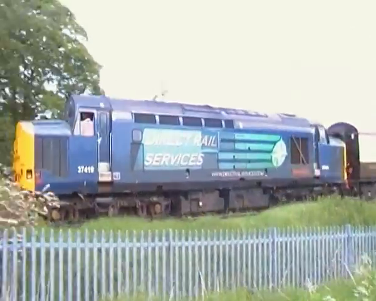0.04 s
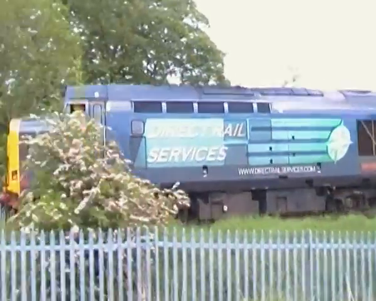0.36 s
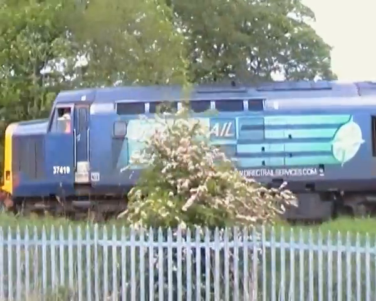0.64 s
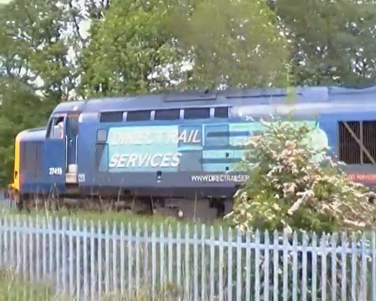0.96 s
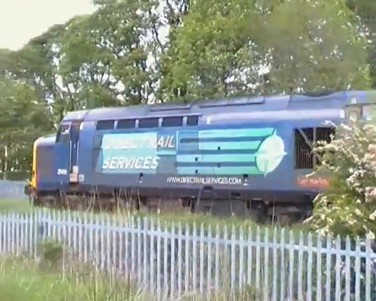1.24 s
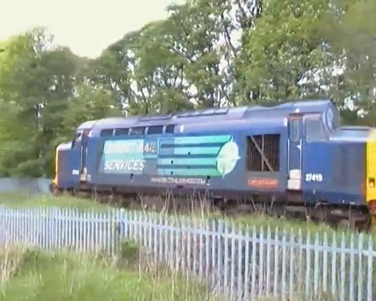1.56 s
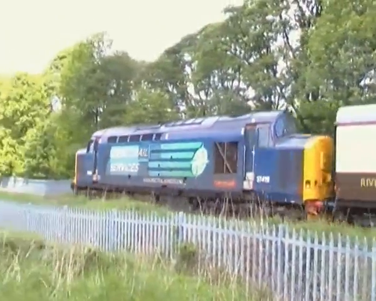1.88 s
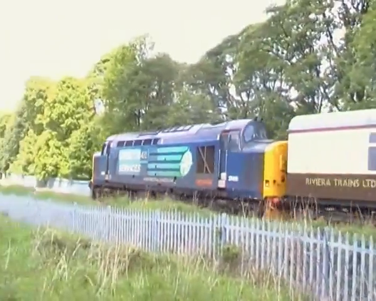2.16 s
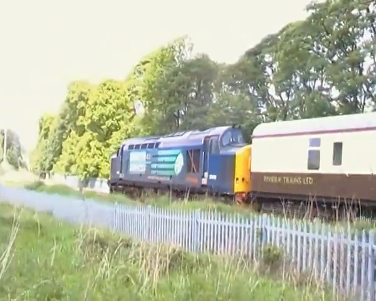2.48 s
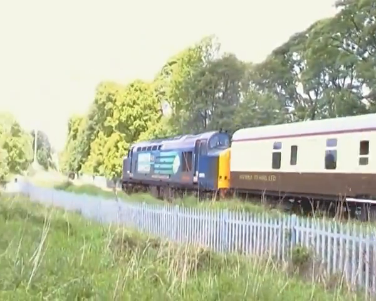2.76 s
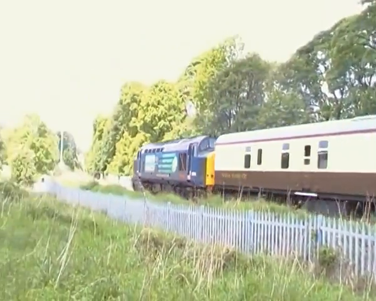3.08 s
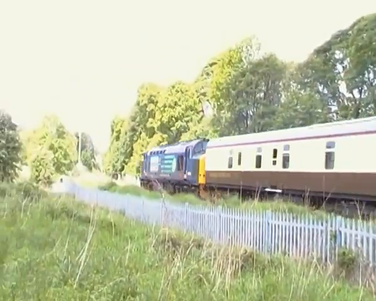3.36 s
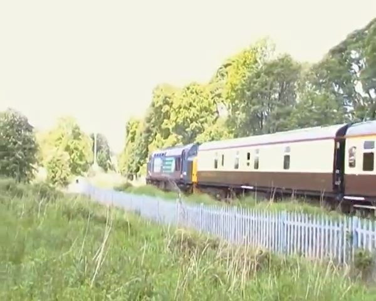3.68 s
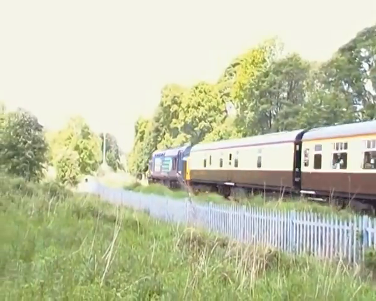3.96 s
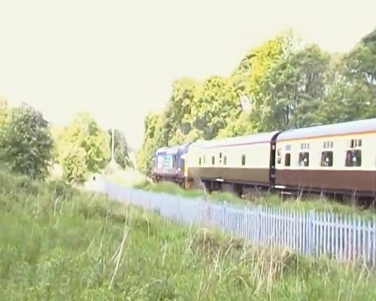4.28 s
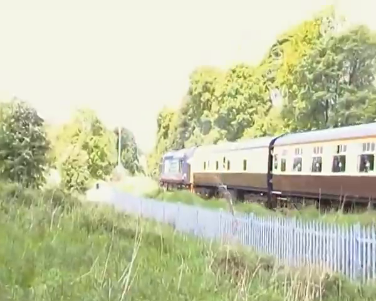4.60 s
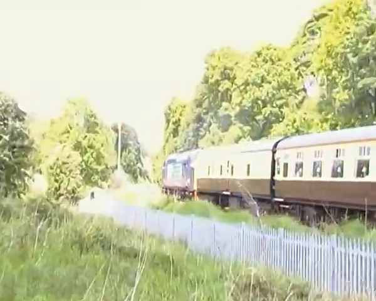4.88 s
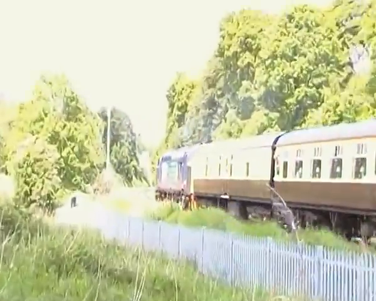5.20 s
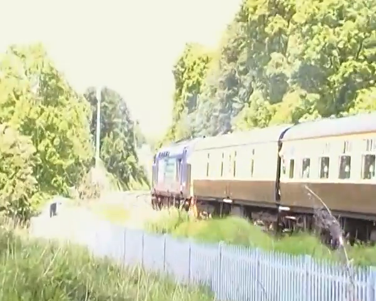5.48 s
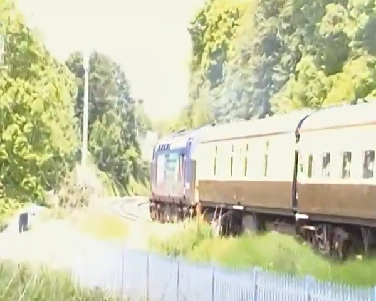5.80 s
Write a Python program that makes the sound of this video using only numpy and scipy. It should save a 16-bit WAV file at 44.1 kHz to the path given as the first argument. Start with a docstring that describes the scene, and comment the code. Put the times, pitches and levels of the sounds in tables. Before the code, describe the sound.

A diesel locomotive passes close at full power, throbbing and rasping with a turbo whistle, then pulls away as its coaches clank and roll by.

```python
"""A twelve-cylinder diesel locomotive comes up at full power, its uneven exhaust puffs making a throbbing
drone and a rasping bark while the turbocharger whistles and spits in time with them. It passes at one
second and the pitch sags. As it turns away, couplings clank, hard firings crack, and the tone hollows,
the exhaust now heard from behind over the grass. Last, the wheels swell as the coaches roll by and
screen the stack."""
import sys
import numpy as np
from scipy import signal
from scipy.fft import rfft, irfft, next_fast_len
from scipy.io import wavfile

SR = 44100
rng = np.random.default_rng(int(sys.argv[2]) if len(sys.argv) > 2 else 0)


def transcribe(signal):
    """Save signal, clipped to [-1, 1], as a 16-bit WAV file at the path in sys.argv[1]."""
    frames = np.atleast_2d(signal).T
    limited = np.clip(frames, -1, 1)
    pcm = np.round(limited * 32767).astype(np.int16)
    wavfile.write(sys.argv[1], SR, pcm)


N = 266364
TIME = np.arange(N) / SR
PASS_S, TRACK_M, SPEED_M_PER_S = 1, 12.2, 14.8
# doublings of the locomotive's distance since its closest point
DOUBLINGS = np.log2(np.hypot(TRACK_M, SPEED_M_PER_S * (TIME - PASS_S)) / TRACK_M)


def amp(db):
    """Decibels to gain."""
    return np.exp(np.asarray(db) * (np.log(10) / 20))


def unit_rms(x):
    """Scales to rms 1."""
    return x / np.sqrt(np.mean(x ** 2) + 1e-20)


def curve(rows):
    """An automation curve, at every sample."""
    return np.interp(TIME, *np.transpose(rows))


def eq_db(points, hz):
    """Reads an EQ curve on a log-frequency axis."""
    f, db = np.transpose(points)
    return np.interp(np.log(hz + 1), np.log(f + 1), db)


def eq(x, points, delay_s=0):
    """Applies an EQ curve (f/Hz, level/dB) and an optional delay."""
    size = next_fast_len(N + 4096, real=True)
    hz = np.fft.rfftfreq(size, 1 / SR)
    lag = np.exp(-2j * np.pi * hz * delay_s)
    return irfft(rfft(x, size) * amp(eq_db(points, hz)) * lag, size)[:N]


def noise():
    """White noise."""
    return rng.standard_normal(N)


def wander(per_s):
    """Random modulation of rms 1."""
    return unit_rms(np.interp(TIME * per_s, np.arange(4096), rng.standard_normal(4096)))


def swell(s, half_s):
    """A smooth bump of height 1 around one moment."""
    return np.exp(-np.minimum(((TIME - s) / half_s) ** 2, 20))


def resonate(x, hz, width_hz):
    """A resonance at a fixed or moving pitch, applied twice for steep skirts."""
    carrier = np.exp(2j * np.pi * (np.cumsum(np.full(N, hz) / SR) % 1))
    r = np.exp(-np.pi * width_hz / SR)
    baseband = signal.lfilter([(1 - r) ** 2], [1, -2 * r, r * r], x * carrier.conj())
    return unit_rms((carrier * baseband).real)


# engine cycle rate, sagging with the Doppler shift: t/s, f/Hz
CYCLE_RATE = [(0.0, 7.291), (0.5, 7.237), (1.0, 7.095), (1.5, 6.976), (2.0, 6.876), (3.0, 6.824),
              (4.0, 6.793), (6.04, 6.79)]
def engine_cycles():
    """The engine's clock: cycles heard so far."""
    return np.cumsum(curve(CYCLE_RATE)) / SR


def firings(cycles, twelfths, db, scatter_db, jitter_s):
    """One click for each firing; no two burn quite alike."""
    beats = np.arange(46)[:, None] + twelfths / 12
    timing, strength = rng.standard_normal((2, *beats.shape))
    at_s = np.interp(beats, cycles, TIME, right=-1) + jitter_s * timing
    heard = (at_s > 0) & (at_s < TIME[-1])
    return np.bincount((at_s[heard] * SR).astype(int), amp(db + scatter_db * strength)[heard], N)


def puffs(clicks, rise_s, fall_s, steady):
    """Gas flow: each firing swells softly and dies over a steady stream."""
    t = TIME[:SR // 10]
    shape = (1 - np.exp(-(t / rise_s) ** 2)) * np.exp(-t / fall_s)
    return unit_rms(unit_rms(signal.oaconvolve(clicks, shape)[:N]) + steady)


# how far the locomotive has turned its back: t/s, aspect (0 beside, 1 three-quarter, 2 behind)
ASPECT = [(1.35, 0.19), (1.7, 0.77), (3.1, 1.14), (4.5, 1.6)]
def fader(aspects_db, doubling_db=0, bush_db=0, screen_db=0):
    """A layer's gain from the three aspects, the distance, a bush in the way and the screening coaches."""
    facing_db = np.interp(curve(ASPECT), [0, 1, 2], aspects_db)
    in_bush = swell(0.87, 0.37)
    screened = (1 + np.tanh((TIME - 5.18) / 0.099)) / 2
    return amp(facing_db + doubling_db * DOUBLINGS + bush_db * in_bush + screen_db * screened)


def turning_dip(depth_db=-5):
    """The level ducks briefly as the locomotive turns away."""
    return amp(depth_db * swell(1.69, 0.19))


# EQ of the rolling bed: f/Hz, level/dB
WHEELS_EQ = [(15, -19), (60, -15), (130, -5), (230, -16), (430, 0.5), (800, -4), (1400, -6.5),
             (2500, -12.5), (4500, -24.5), (7000, -29), (12000, -64)]
def wheels(uneven_db=1.5):
    """Roar of wheels on rails, growing as the coaches come by."""
    rolling_db = curve([(2.2, -22), (4.5, -17.5)])
    return unit_rms(eq(noise(), WHEELS_EQ)) * amp(rolling_db + uneven_db * wander(14))


# hits of couplings and bogies: t/s, level/dB before the trim, f/Hz
CLANKS = [(1.8294, -15, 1420), (2.2365, -10.5, 1220), (2.5213, -13, 1660), (2.5726, -10, 1260),
          (3.207, -10.5, 1560), (4.2866, -19, 1656), (4.678, -10, 1514)]
def clanks(attack_s=0.001, ring_s=0.017, trim_db=-4):
    """Steel knocks: a close cluster of modes that dies quickly."""
    t, out = TIME[:SR // 8], np.zeros(N + SR)
    envelope = np.exp(-t / ring_s) * (1 - np.exp(-t / attack_s))
    for s, db, hz in CLANKS:
        modes = sum(np.sin(2 * np.pi * (hz * ratio * t + rng.random())) for ratio in (0.94, 1, 1.05))
        out[int(s * SR):][:len(t)] += amp(db + trim_db) * modes * envelope
    return out[:N]


# rasp cues: t/s, half length/s, level/dB, centre f/Hz
RASPS = [(1.056, 0.035, -26, 3000), (1.2, 0.022, -26, 3000), (3.438, 0.04, -18.5, 1560),
         (3.76, 0.071, -23.5, 1600), (4.33, 0.11, -28, 1630), (4.683, 0.09, -21.5, 1570),
         (4.95, 0.078, -22, 1560)]
# EQ of one rasp: multiple of the centre, level/dB
RASP_EQ = [(0.56, -21), (1, 14.5), (1.6, 7), (2.6, 8), (3.75, 0), (5.6, -21)]
def rasps(grain_db=1.8):
    """Short, grainy swells of rubbing steel and rushing gas."""
    out = 0
    for s, half_s, db, hz in RASPS:
        band = eq(noise(), [(hz * ratio, band_db) for ratio, band_db in RASP_EQ])
        out += amp(db) * swell(s, half_s) * unit_rms(band)
    return out * unit_rms(amp(grain_db * wander(150)))


# partials of the engine's hum: multiple of the cycle rate, rms level/dB
ENGINE_HARMONICS = [(48, -47), (53, -39.5), (60, -65), (64, -35), (68, -36)]
def engine_hum(cycles):
    """Faint, steady humming tones locked to the engine cycle."""
    return sum(amp(db + 0.5 * wander(2.8)) * np.sqrt(2) * np.sin(2 * np.pi * order * cycles)
               for order, db in ENGINE_HARMONICS)


# the whistle swells and fades in the hot air: t/s, half length/s, level change/dB
WHISTLE_SWELLS = [(0.1, 0.047, 3), (0.304, 0.029, -9), (0.49, 0.04, -3), (0.6, 0.027, 3.5),
                  (0.657, 0.022, -16), (0.78, 0.023, -8), (1.069, 0.035, 5), (1.206, 0.032, 1),
                  (1.42, 0.046, 2), (1.97, 0.07, -2)]
def turbo_whistle(cycles, flow, order=536.5, waver_hz=17, flutter_db=4.2, octave_db=-20, chop=0.14):
    """The turbocharger's blade tone and its octave; puffs chop it and hot air makes it flutter."""
    blades = order * cycles + np.cumsum(waver_hz * wander(110)) / SR
    tone = np.sin(2 * np.pi * blades) + amp(octave_db) * np.sin(4 * np.pi * blades)
    flutter = amp(flutter_db * np.minimum(wander(80), 1))
    envelope = unit_rms(flutter * (1 - chop + chop * flow))
    swells_db = sum(db * swell(s, half_s) for s, half_s, db in WHISTLE_SWELLS)
    return np.sqrt(2) * tone * envelope * amp(swells_db) * fader((-25.5, -34, -37), doubling_db=-1.5)


# EQ of the spit's sizzle: f/Hz, level/dB
SPIT_EQ = [(3500, -51), (5000, -12.5), (7000, -19.5), (8000, -14), (9000, -10.5), (9600, -2.5), (10100, 2),
           (10500, -4.5), (11200, -7), (12000, -30)]
# fader ride of the spit, surging as the train goes by: t/s, level/dB before the trim
SPIT_RIDE = [(0, -25), (0.2, -25), (0.55, -29.5), (0.68, -31.5), (1.3, -24.5), (2.0, -23.5), (2.3, -26),
             (2.47, -28), (2.58, -25), (3.0, -27), (3.12, -29.5), (3.25, -27.5), (3.42, -28), (3.55, -24),
             (4.07, -29.5), (4.37, -26.5), (4.75, -31), (5.2, -30.5), (5.42, -38.5), (6.04, -33.5)]
def turbo_spit(flow, centre_hz=9225, receding_cycle_hz=6.82, trim_db=2.5):
    """Bright spurts of turbocharger hiss, sliding down with the Doppler shift."""
    shift_hz = centre_hz * (curve(CYCLE_RATE) / receding_cycle_hz - 1)
    doppler = np.exp(2j * np.pi * np.cumsum(shift_hz) / SR)
    spurts = signal.hilbert(eq(noise() * flow, SPIT_EQ), next_fast_len(N))[:N]
    return unit_rms((spurts * doppler).real) * amp(curve(SPIT_RIDE) + trim_db)


# EQ of the gas hiss: f/Hz, level/dB
HISS_EQ = [(1500, -35), (2500, -6), (3200, 3), (4200, 3.5), (5200, -2), (6200, -12), (7200, -9.5),
           (9000, -6.5), (12000, -34)]
def hiss(flow):
    """Escaping gas hisses, pulsing with the exhaust flow."""
    gas = unit_rms(eq(noise() * (flow + 0.42), HISS_EQ))
    return gas * fader((-25, -24.5, -20.5), doubling_db=-2.2, bush_db=-1.5, screen_db=-4)


# EQ of an exhaust crack: f/Hz, level/dB
CRACK_EQ = [(100, -38), (260, -55), (420, -0.5), (800, 4), (1500, 1), (2400, -8), (4500, -18), (9000, -64)]
def cracks(flow):
    """Snappy bursts of turbulence at the firings, strongest from behind."""
    bursts = unit_rms(eq(noise() * flow, CRACK_EQ))
    return bursts * fader((-41, -26, -19.5), doubling_db=-1, screen_db=-2)


# accents, the hardest cracks: t/s, level/dB before the trim
BANGS = [(2.52, -7), (2.575, -13), (2.753, -11), (2.865, -22), (3.353, -5.5), (3.988, -8), (4.037, -5.5)]
def bangs(fall_s=0.0039, trim_db=-3):
    """Single hard firings: a short burst of turbulence each."""
    s, db = np.transpose(BANGS)
    clicks = np.bincount((s * SR).astype(int), amp(db + trim_db), N)
    envelope = signal.oaconvolve(clicks, np.exp(-TIME[:SR // 20] / fall_s))[:N]
    return unit_rms(eq(noise(), CRACK_EQ)) * envelope


# pitch of the stack's hollow ring: t/s, f/Hz
STACK_PITCH = [(0, 870), (.35, 1032), (.55, 878), (0.95, 826), (2.9, 946), (3.4, 840), (6.04, 714)]
def stack_rings(knocks, rough=0.45, sink_from_s=3.8, sink_hz_per_s=172):
    """Firings ring the stack in short pips; from behind, a higher ring wavers and sinks."""
    gas = rough * puffs(knocks, rise_s=0.0003, fall_s=0.0041, steady=0.065)
    hollow = resonate(noise() * gas + knocks, curve(STACK_PITCH), width_hz=115)
    high_hz = 1657 - sink_hz_per_s * np.maximum(TIME - sink_from_s, 0) + 70 * wander(40)
    high = resonate(noise() * gas + knocks, high_hz, width_hz=145)
    return (hollow * fader((-21.5, -31.5, -36), doubling_db=2, bush_db=0.5)
            + high * fader((-38, -36, -15), doubling_db=-0.5, screen_db=-2))


# the boom rises to brief howls: t/s, half length/s, level/dB, f/Hz
HOWLS = [(2.85, 0.24, -25, 417), (3.058, 0.058, -20, 418), (4.005, 0.061, -19.5, 430)]
def silencer_boom(fronts, flow, base_hz=350, side_hz=91, doubling_hz=41.6):
    """Pressure fronts and turbulence make the silencer casing boom and now and then howl."""
    boom_hz = base_hz + side_hz * np.maximum(1 - curve(ASPECT), 0) ** 2 + doubling_hz * DOUBLINGS
    boom = resonate(noise() * (flow + 0.2) + 1.2 * unit_rms(fronts), boom_hz, width_hz=187)
    waver = np.cumsum(14 * wander(45)) / SR
    howls = sum(amp(db) * swell(s, half_s) * np.sqrt(2) * np.sin(2 * np.pi * (hz * TIME + waver))
                for s, half_s, db, hz in HOWLS)
    return boom * fader((-25, -35.5, -34.5), doubling_db=2) + howls


def thump(cycles, twelfths=7.66, late_twelfths=0.185):
    """One hard cylinder kicks the silencer each cycle: a slap from the side, a later ring from behind."""
    lag = late_twelfths * np.minimum(curve(ASPECT), 1) / 12
    kicks = firings(cycles - lag, twelfths, 0, scatter_db=0.7, jitter_s=0.0001)
    slap = resonate(kicks, hz=480, width_hz=280) * fader((-26, -42, -42), doubling_db=0.5)
    ring = resonate(kicks, hz=411, width_hz=144) * fader((-34, -29.5, -33.5))
    return slap + ring


def blasts(fronts, push_s=0.0015):
    """Each exhaust valve lets go a steep pressure front followed by a suction."""
    age = TIME[:SR // 50] / push_s
    pressure = signal.oaconvolve(fronts, (1 - age) * np.exp(-age))[:N]
    punch = eq(pressure, [(60, -29), (130, 0), (170, -3), (235, 6.5), (330, 2), (520, -12.5),
                          (700, -7), (1500, -23), (4000, -13)])
    return unit_rms(punch) * fader((-20.5, -27, -30), doubling_db=-4.7)


# colour of the bark from beside, three-quarter and behind: f/Hz, level/dB
BESIDE_EQ = [(110, -36), (165, -11), (230, -1), (300, -2), (500, -13), (620, -1.5), (720, -34), (880, -6),
             (1150, -4.5), (1400, -13), (1800, -11.5), (2500, -14.5), (3500, -58)]
QUARTER_EQ = [(110, -22), (155, -14), (200, -24.5), (270, -11.5), (350, 3.5), (470, 1.5), (620, -19),
              (800, 1), (1000, -3), (1400, -11), (1800, -8.5), (2400, -14), (3500, -22)]
BEHIND_EQ = [(110, -18), (160, -13), (240, -25), (310, -30), (420, -6.5), (620, 3.5), (1000, -3), (1550, 7),
             (1800, -22.5), (2400, -13), (3500, -76)]
def bark(flow):
    """Rasping exhaust turbulence; the ground reflection scoops the low mids as the train recedes."""
    rasp = eq(noise() * flow, [(150, 6.5), (280, -3.5), (500, -5.5)])
    hz, t, spectra = signal.stft(rasp, SR, nperseg=1024, noverlap=768)
    aspect = np.interp(t, *np.transpose(ASPECT))
    morph = amp(sum(eq_db(colour, hz)[:, None] * np.maximum(1 - abs(aspect - k), 0)
                    for k, colour in enumerate([BESIDE_EQ, QUARTER_EQ, BEHIND_EQ])))
    morph /= np.linalg.norm(morph, axis=0)
    voiced = unit_rms(signal.istft(spectra * morph, SR, nperseg=1024, noverlap=768)[1][:N])
    gain = fader((-20.5, -18.5, -21), doubling_db=-0.05, bush_db=-2.5, screen_db=0.4)
    return voiced * gain * turning_dip()


# the engine's groove, one row a cylinder, the two banks in turn:
# place/twelfths of a cycle, then level/dB of pressure pulse, steep front, rasp, crack, stack ring
CYLINDERS = [(1.47, -1, -3, 9, -2, -25), (1.9, 0, -21, -1.5, -11, 3.5), (3.6, 7, 0, 1, -18, -30),
             (3.88, -4.5, -20, 7.5, -20, -5), (5.44, 5.5, -16, 6.5, 0.5, -17), (6.03, 5.5, -20, 1.5, -7, 1),
             (7.9, -3, 4, 1.5, -7, -15), (8.04, -3.5, -13, 9.5, -7, -5), (9.5, 4, -1.5, 8, -0.5, -23),
             (10.02, 0, 0.5, 4.5, -18, 2.5), (11.48, 3.5, -5.5, -3.5, -34, -25),
             (11.85, -8.5, -20, 2.5, -20, -3.5)]
# balance of the drone's partials: multiple of the cycle rate, side level/dB, rear level/dB
DRONE_ORDERS = [(6, -18, -32), (7, -44, -21.5), (8, -53, -65), (9, -16, -29), (10, -19, -34),
                (11, -25, -24), (12, -31, -47), (13, -18.5, -21.5), (14, -26.5, -61), (15, -31, -22.5),
                (16, -29.5, -19.5), (17, -14.5, -47), (18, -48, -23.5), (19, -23.5, -30),
                (20, -31.5, -33.5), (21, -46, -63), (22, -52, -27), (23, -28, -42), (25, -42, -72)]
def drone(cycles):
    """Low exhaust partials, phased to swing down through zero together at the strong cylinders."""
    twelfths, pulse_db = np.transpose(CYLINDERS)[:2]
    behind, out = np.clip(curve(ASPECT), 0, 1), 0
    for order, side_db, rear_db in DRONE_ORDERS:
        phase = np.angle(np.sum(amp(pulse_db) * np.exp(-2j * np.pi * order * twelfths / 12)))
        gain = amp(side_db + behind * (rear_db - side_db))
        out -= gain * np.sin(2 * np.pi * order * cycles + phase)
    return unit_rms(out) * fader((-20, -20.5, -24.5), doubling_db=-1.5)


# stereo width: f/Hz, side minus mid level/dB
WIDTH_EQ = [(30, -21), (60, -11), (130, -15.5), (300, -21), (600, -15), (1100, -18), (2000, -7.5),
            (4000, -10.5), (7000, -1.5), (10000, -11), (12000, -6)]
# stereo balance: f/Hz, left minus right level/dB
BALANCE_EQ = [(60, 3.5), (110, 0), (190, 2), (350, 0.5), (620, -1), (1120, 0.5), (2020, 1.0), (3620, -1.0),
              (6500, 0.5), (11700, -4)]
def stereo(mid, scattered, left_lag_s=0.000012):
    """Scattered sound, turned 90 degrees in phase, gives the width; the left hears a touch later."""
    side = eq(signal.hilbert(scattered, next_fast_len(N))[:N].imag, WIDTH_EQ)
    channels = []
    for sign in (1, -1):
        balance = [(hz, sign * db / 2) for hz, db in BALANCE_EQ]
        channels.append(eq(mid + sign * side, balance, sign * left_lag_s / 2))
    return np.array(channels)


def scene():
    """The firing pattern drives the exhaust, one bank alone the turbo's pulsing; wheels roll beneath."""
    cycles = engine_cycles()
    twelfths, _, front_db, rasp_db, crack_db, ring_db = np.transpose(CYLINDERS)
    fronts = firings(cycles + 0.01, twelfths, front_db, scatter_db=2.5, jitter_s=0.00008)
    rasp_clicks = firings(cycles + 0.01, twelfths, rasp_db, scatter_db=3, jitter_s=0.0008)
    bank_clicks = firings(cycles + 0.011, twelfths[1::2], 0, scatter_db=2.5, jitter_s=0.0008)
    crack_clicks = firings(cycles + 0.0044, twelfths, crack_db, scatter_db=2.4, jitter_s=0.00033)
    ring_lag = 0.00801 * (1 + curve(ASPECT))  # cycles; the stack rings later still from behind
    knocks = firings(cycles - ring_lag, twelfths, ring_db, scatter_db=1.7, jitter_s=0.0004)
    flow = puffs(rasp_clicks, rise_s=0.0025, fall_s=0.0063, steady=0.42)
    turbo_flow = puffs(bank_clicks, rise_s=0.0077, fall_s=0.0039, steady=1)
    crack_flow = puffs(crack_clicks, rise_s=0.003, fall_s=0.0025, steady=0.025)
    tones = engine_hum(cycles) + turbo_whistle(cycles, turbo_flow) + drone(cycles)
    resonances = thump(cycles) + stack_rings(knocks) + silencer_boom(fronts, flow)
    direct = tones + resonances * turning_dip() + blasts(fronts) + clanks() + rasps()
    # fresh noise for each of the two opens up the image
    mid, scattered = (direct + bark(flow) + cracks(crack_flow) + hiss(flow)
                      + turbo_spit(turbo_flow) + bangs() + wheels() for _ in range(2))
    return stereo(mid, scattered)


# treble roll-off that dulls the very top of the sizzle: f/Hz, level/dB
ROLL_OFF_EQ = [(10600, 0), (11400, -7.5), (12000, -7)]
def record(dry, edge_hz=12000):
    """Dulls the top, clips any peaks at full scale, then low-passes."""
    dulled = np.array([eq(channel, ROLL_OFF_EQ) for channel in dry])
    lowpass = signal.firwin(301, edge_hz, window=("kaiser", 9), fs=SR)
    return signal.oaconvolve(np.clip(dulled, -1, 1), lowpass[None], "same", axes=1)


dry = scene()
out = record(dry)
transcribe(out)
```